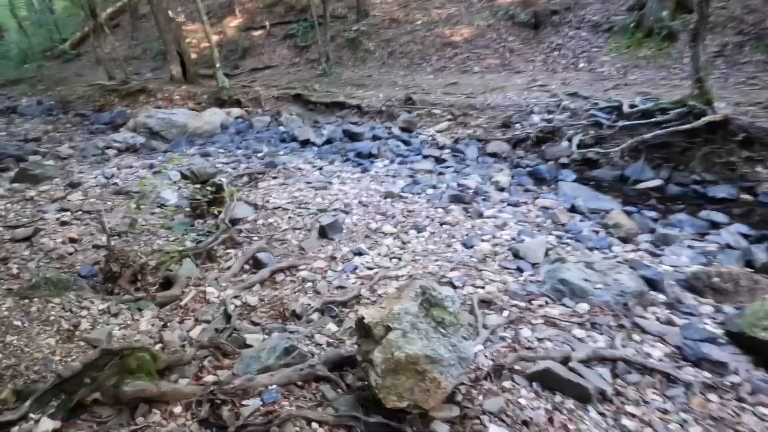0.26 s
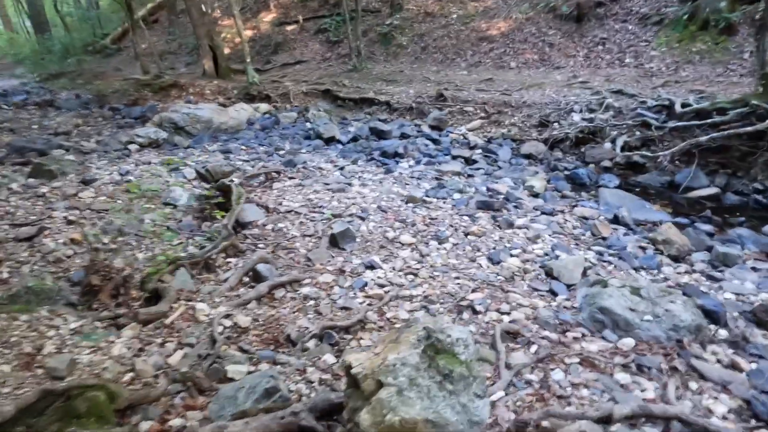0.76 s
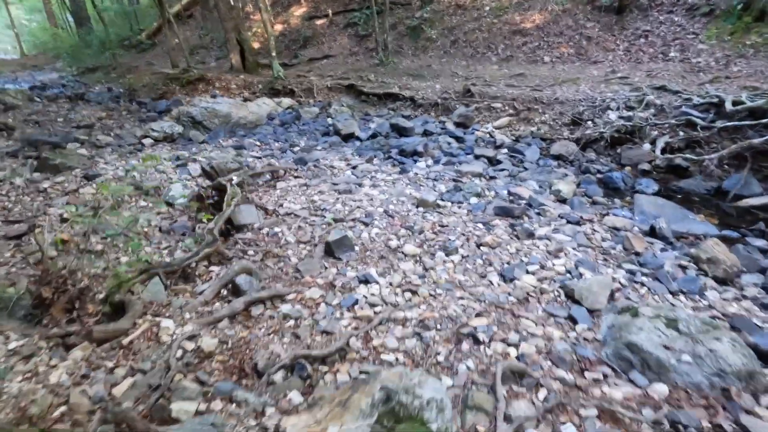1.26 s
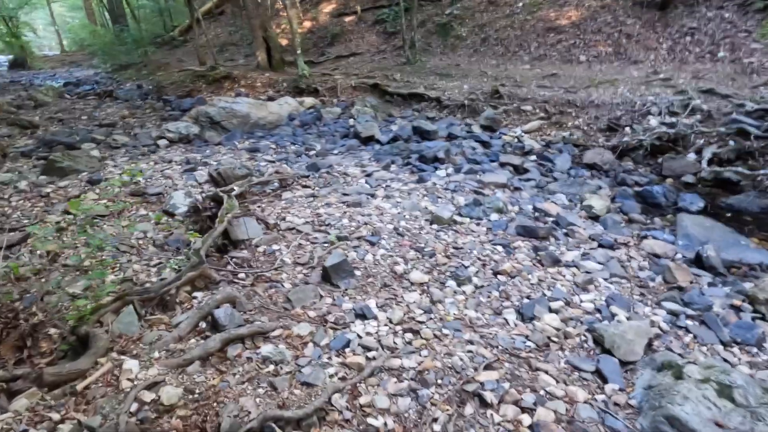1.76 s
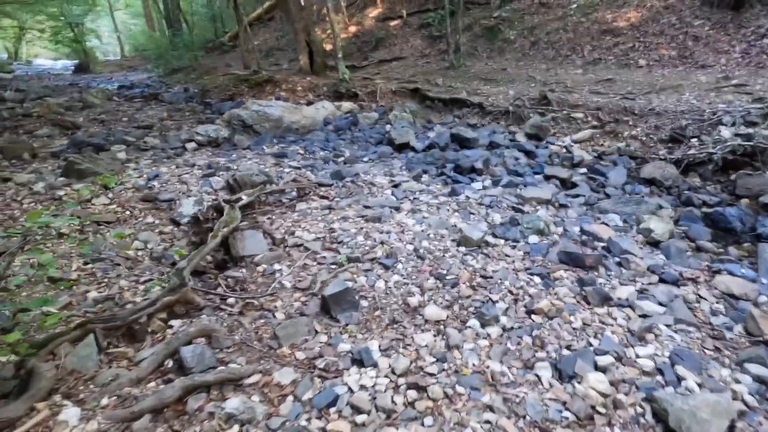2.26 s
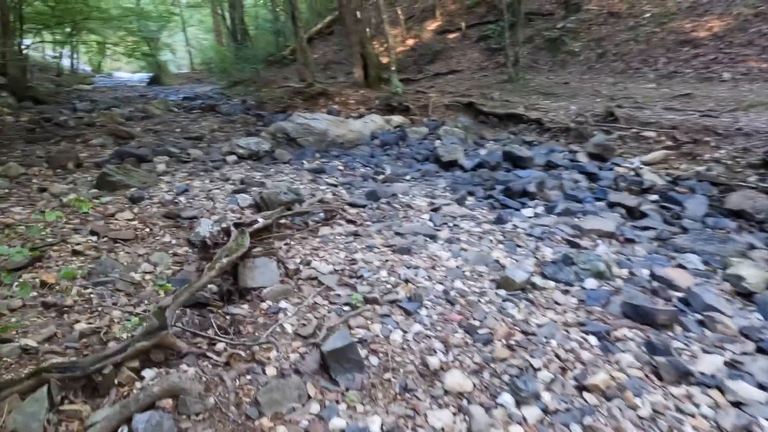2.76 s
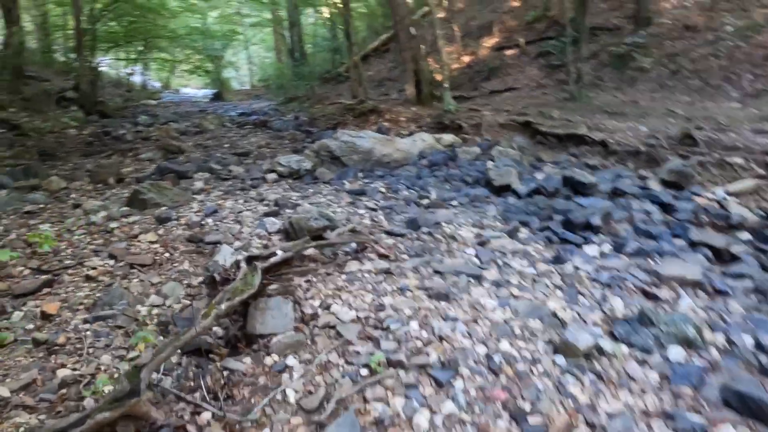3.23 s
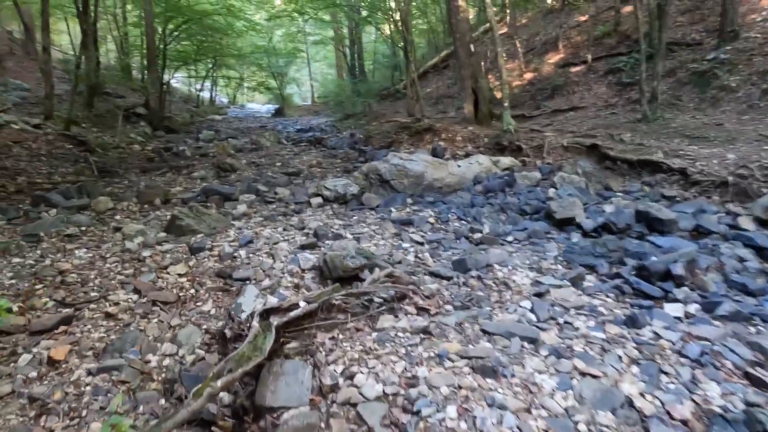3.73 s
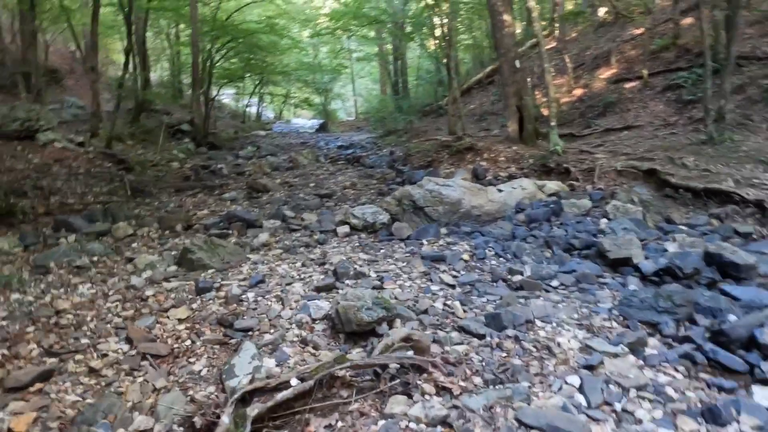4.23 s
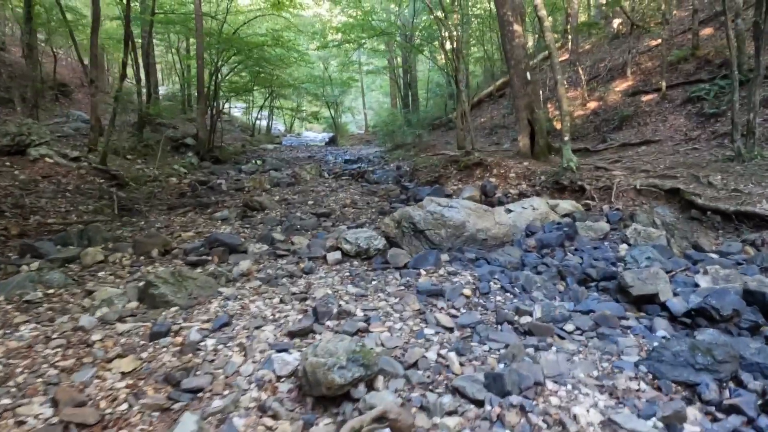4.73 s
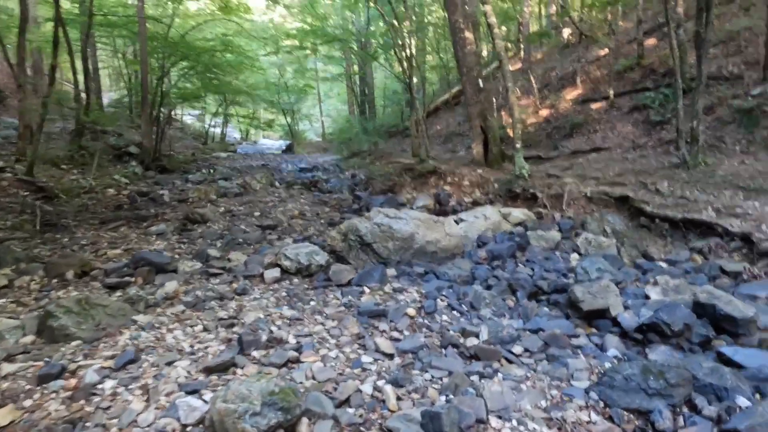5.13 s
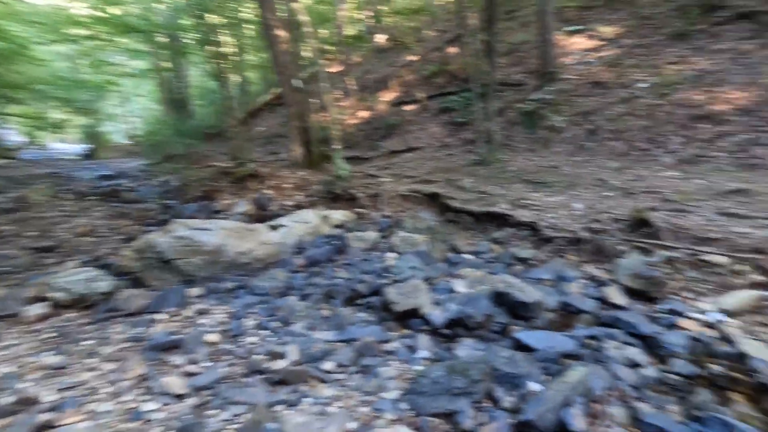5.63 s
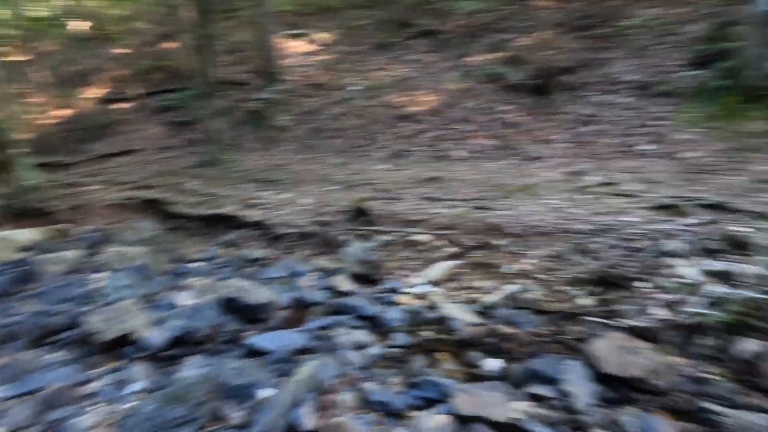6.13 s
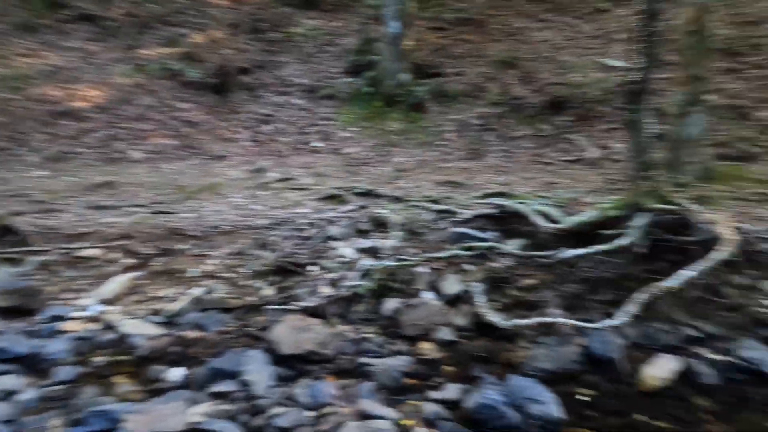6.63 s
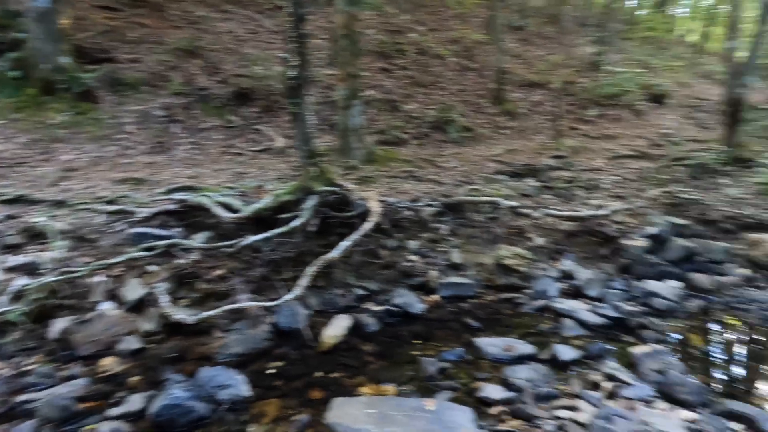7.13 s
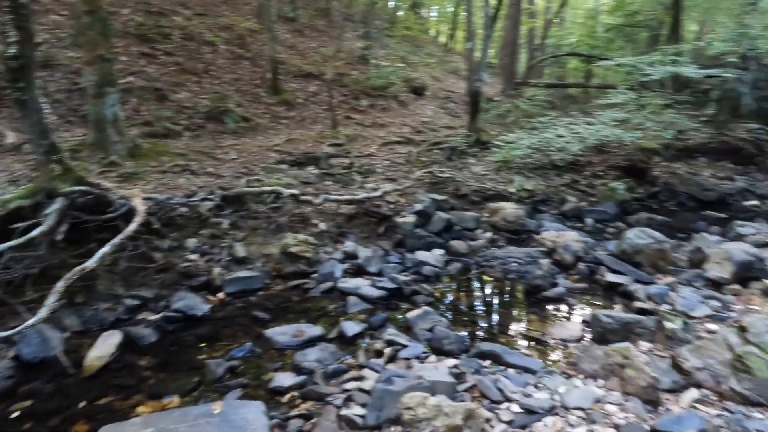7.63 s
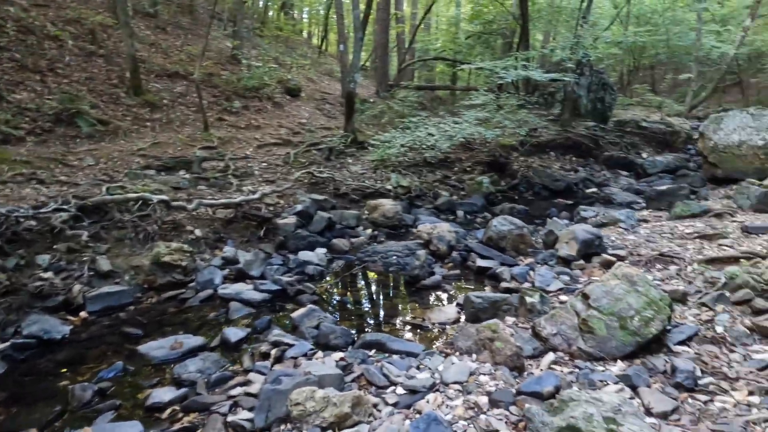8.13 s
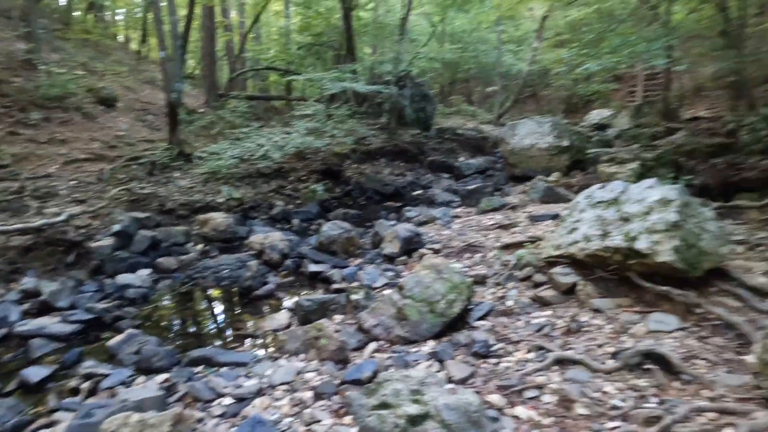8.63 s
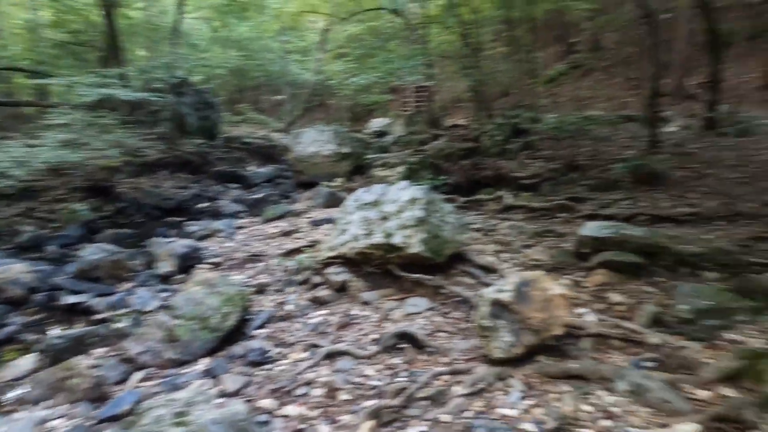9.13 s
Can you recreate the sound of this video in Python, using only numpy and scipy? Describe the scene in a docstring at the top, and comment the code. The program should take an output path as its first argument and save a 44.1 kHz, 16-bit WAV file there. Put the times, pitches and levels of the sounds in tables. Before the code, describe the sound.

Slow footsteps crunch over loose creek gravel, stones knocking and grinding, while insects whirr faintly overhead and low wind rumble thumps the microphone once.

```python
"""Slow steps on creek stones

Someone walks slowly over loose stones and gravel in a dry creek bed in a wood.
Large stones knock (short ringing tones) and grind (dense random catches that ring the stones).
Pebbles, grit and sand crunch: thousands of tiny random collisions under each press of the shoe.
Insects whirr high in the trees (wavering noise in a narrow band of treble).
Air and the jolts of walking rumble on the microphone (deep noise), and one gust thumps it."""
import sys
import numpy as np
from scipy import signal
from scipy.fft import rfft, irfft, next_fast_len
from scipy.io import wavfile
from scipy.ndimage import uniform_filter1d

SR = 44100
rng = np.random.default_rng(int(sys.argv[2]) if len(sys.argv) > 2 else 0)


def generate_wav(signal):
    """Clip the signal to [-1, 1] and save it as 16-bit WAV at the path in sys.argv[1]."""
    frames = np.transpose(np.atleast_2d(signal))
    scaled = np.clip(frames, -1, 1) * 32767
    pcm = np.round(scaled).astype(np.int16)
    wavfile.write(sys.argv[1], SR, pcm)


N = 413658  # length in samples
CURVE_STEP = 40  # samples between the points of a swell


def from_db(db):
    """Turn decibels into a gain."""
    return 10 ** (np.asarray(db) / 20)


def rms_one(x):
    """Scale a sound to an average (rms) level of 1."""
    return x / np.sqrt(np.mean(x ** 2) + 1e-20)


def gains_in_time(rows):
    """Join the rows with straight lines in dB; gives one gain curve for each dB column."""
    seconds, *columns = np.transpose(rows)
    t = np.arange(N) / SR
    return [from_db(np.interp(t, seconds, column)) for column in columns]


def colour(x, points):
    """Filter a sound through (pitch_hz, level_db) points, without any sound before its cause."""
    size = next_fast_len(N + SR // 2, real=True)
    hz, db = np.transpose(points)
    grid = np.fft.rfftfreq(8192, 1 / SR) + 1  # 1 Hz up, as zero has no logarithm
    wanted = from_db(np.interp(np.log(grid), np.log(hz), db))
    # folding the cepstrum gives the minimum-phase filter
    cepstrum = irfft(np.log(wanted))
    cepstrum[1:len(grid) - 1] *= 2
    cepstrum[len(grid):] = 0
    response = irfft(np.exp(rfft(cepstrum)))
    return irfft(rfft(x, size) * rfft(response, size), size)[..., :N]


def pan(x, db):
    """Make left louder than right by db; a negative db leans right."""
    return x * from_db(db * np.array([[1], [-1]]) / 2)


def drift(rate):
    """A random curve of rms 1 with this many turning points a second."""
    points = rng.standard_normal(int(N / SR * rate) + 2)
    return rms_one(np.interp(np.arange(N) / SR * rate, np.arange(len(points)), points))


def noise(spectrum, side_db):
    """Coloured stereo noise of rms 1, partly different in the two ears."""
    mid, side = rng.standard_normal((2, N))
    return rms_one(colour(mid + from_db(side_db) * side * [[1], [-1]], spectrum))


def ring(clicks, hz, cycles):
    """A resonance at one pitch that dies by 60 dB in so many cycles."""
    angle = 2 * np.pi * hz / SR
    radius = np.exp(-np.log(1000) * hz / (cycles * SR))
    feedback = [1, -2 * radius * np.cos(angle), radius * radius]
    return signal.lfilter([1, 0, -1], feedback, clicks + 1e-18)


def blow(x, db):
    """Give a short sound the energy of 5 ms at this level."""
    return from_db(db) * x / np.sqrt(np.sum(x ** 2) / (.005 * SR))


def add(out, s, sound):
    """Mix a sound in at time s."""
    at = round(s * SR)
    out[at:at + len(sound)] += sound[:N - at]


def swell(start, swell_s, release_s):
    """Build up to 1, then let go, falling 20 dB in the release time; both are curved."""
    t = np.arange(0, N, CURVE_STEP) / SR - start
    rise = np.clip(t / swell_s, 0, 1) ** 1.4
    return rise * from_db(-20 * (np.maximum(t - swell_s, 0) / release_s) ** 1.3)


def together(shapes, dbs):
    """One gain curve from overlapping swells, whose powers add."""
    gain = np.sqrt(from_db(dbs) ** 2 @ np.square(shapes))
    return np.interp(np.arange(N), np.arange(0, N, CURVE_STEP), gain)


# Tone of the hush of the wood and of the insects: pitch_hz, level_db
HUSH_TONE = [(400, -5), (800, -7.5), (1200, 3), (2500, -3), (3800, -7.5), (5500, -6.5), (8000, -31),
             (9300, -14.5), (13600, -21), (14600, -29)]
INSECT_TONE = [(5000, -27), (6100, -12.5), (6550, 0), (7000, 5.5), (7300, 2), (7600, -7.5), (7950, -14.5),
               (8400, -29)]


def woods(insect_db=-50.5, waver_db=-2.2, hush_db=-61):
    """Many far insects blend into one wavering high whirr over the hush of the wood."""
    whirr_gain = from_db(insect_db + waver_db * drift(rate=2.68))
    insects = whirr_gain * noise(INSECT_TONE, side_db=-6.5)
    hush = from_db(hush_db) * noise(HUSH_TONE, side_db=-6.5)
    return pan(insects, db=2.5) + pan(hush, db=9.5)


# Tone of the deep and the upper rumble: pitch_hz, level_db
DEEP_TONE = [(12, -14.5), (25, -1), (50, 2), (95, -7), (150, -20), (300, -61), (2000, -110)]
UPPER_TONE = [(60, -18.5), (115, 1.5), (180, 0.5), (265, -4), (325, -14), (500, -30), (4000, -100)]
# Breeze on the microphone, before the trims in air(): time_s, deep_level_db, upper_level_db
BREEZE_LEVELS = [(0.0, -41.5, -43.5), (2.6, -38.5, -40.5), (3.65, -42.5, -38.5), (5.4, -39, -39.5),
                 (6.3, -40, -42.5), (7.8, -45.5, -38.5), (9.38, -38.5, -39.5)]
# Gusts on the microphone, before the same trims: start_s, swell_s, release_s, deep_level_db
GUST_SWELLS = [(6.5, 0.058, 0.42, -21), (6.921, 0.077, 0.62, -16.5), (7.15, 0.26, 0.047, -24.5)]
# The thump of a gust: start_s, level_db, pitch_hz
GUST_THUMPS = [(6.995, -9.5, 128), (7.042, -13.5, 148.7)]


def air(deep_db=0.5, upper_db=1.0, gust_upper_db=-29, surge_db=2.0, thump_s=0.0041):
    """Breeze and gusts make a low, uneven rumble, its deep part stronger on the right; one gust thumps."""
    deep_gain, upper_gain = gains_in_time(BREEZE_LEVELS)
    gust = together([swell(s, up, down) for s, up, down, _ in GUST_SWELLS], [db for *_, db in GUST_SWELLS])
    deep = np.hypot(deep_gain, gust) * noise(DEEP_TONE, side_db=-17.5)
    upper = np.hypot(upper_gain, from_db(gust_upper_db) * gust) * noise(UPPER_TONE, side_db=-21.0)
    rumble = pan(from_db(deep_db) * deep, db=-3.5) + pan(from_db(upper_db) * upper, db=0.5)
    surges = rms_one(from_db(surge_db * drift(rate=12)))
    thump = np.zeros(N)
    t = np.arange(SR // 10) / SR
    for s, db, hz in GUST_THUMPS:
        push = t ** 2 * np.exp(-2 * t / thump_s)  # strongest after thump_s
        add(thump, s, blow(np.sin(2 * np.pi * hz * t) * push, db))
    return surges * rumble + pan(thump, db=-11.0)


# The shoe comes down; the level is that of the ground's thud: start_s, level_db
FOOTFALL_THUDS = [(0.106, -17), (0.598, -25.5), (1.335, -30.5), (2.058, -21.5), (2.2, -35), (2.285, -29),
                  (2.679, -22), (2.765, -25), (3.295, -29), (3.94, -27), (4.036, -25), (4.529, -18.5),
                  (5.188, -20), (5.258, -13.5), (5.306, -23.5), (5.936, -19), (7.236, -24.5)]


def jolts(jolt_db=-33, swell_s=0.036, release_s=0.29):
    """Each footfall shakes the hand-held microphone into a short, deep rumble, always equally strong."""
    shapes = [swell(s, swell_s, release_s) for s, _ in FOOTFALL_THUDS]
    shake = together(shapes, [jolt_db] * len(FOOTFALL_THUDS))
    return pan(shake * noise(DEEP_TONE, side_db=-22), db=-2.5)


# The shoe loads the gravel, before a small lift in footsteps():
# start_s, swell_s, release_s, pebble_level_db, grit_level_db, sand_level_db
SHOE_PRESSES = [(0.02, 0.089, 0.043, -30, -37, -45.5), (.11, 0.022, 0.47, -50, -53, -69),
                (.6, 0.037, 0.3, -50, -55, -72.5), (1.2, 0.45, 0.38, -51, -56, -73.5),
                (1.968, 0.094, 0.31, -42, -49, -61.5), (2.148, 0.038, 0.073, -35.5, -43, -60),
                (2.26, 0.028, 0.034, -41.5, -52, -68.5), (2.555, .014, 0.19, -33, -32, -39.5),
                (2.6, 0.45, 0.45, -46, -49, -63), (3.059, 0.046, .15, -35.5, -46.5, -69),
                (3.19, 0.14, 0.035, -33.5, -38, -48), (3.301, .13, 0.42, -52, -45, -45.5),
                (3.91, 0.026, 0.21, -33, -37.5, -61), (4.101, 0.19, 0.29, -52, -57, -70.5),
                (4.493, 0.03, 0.24, -35, -35, -43.5), (4.965, 0.011, 0.028, -31, -35, -46),
                (5.1, 0.08, 0.24, -37, -41.5, -55.5), (5.349, 0.02, 0.22, -40, -43.5, -61.5),
                (5.922, 0.011, 0.036, -35, -36.5, -40), (5.9, 0.38, 0.16, -35, -38.5, -51.5),
                (6.31, 0.055, 0.08, -37, -37, -50), (6.66, 0.036, 0.071, -31.5, -33, -47.5),
                (6.74, 0.022, 0.06, -26, -26.5, -33), (7.14, 0.17, 0.26, -33, -30, -49),
                (7.42, 0.092, 0.26, -30.5, -33.5, -46), (7.699, 0.037, 0.1, -34, -38, -49),
                (8.385, 0.023, 0.16, -37.5, -43.5, -54.5), (8.569, 0.017, 0.12, -35, -41.5, -64.5),
                (8.811, 0.094, 0.14, -38, -38, -62.5), (9.04, 0.053, 0.091, -23, -29, -40.5),
                (9.155, 0.029, 0.17, -28.5, -25, -37)]
# A stone knocks on another, before the edge clicks are coloured:
# start_s, knock_level_db, knock_pitch_hz, click_level_db, click_pitch_hz
STONE_KNOCKS = [(0.077, -33, 600, -42, 4500), (0.105, -24, 433, -32, 5450), (0.273, -62, 1220, -44, 5250),
                (0.6, -31.5, 698, -40.5, 2920), (2.057, -27, 791.6, -33, 4800),
                (2.2, -33.5, 1039, -36.5, 3840), (2.601, -21, 951, -40, 3502), (2.61, -22, 1080, -40, 3040),
                (2.619, -20, 1040, -36, 3030), (2.628, -19, 892, -37.5, 3910),
                (2.664, -19, 1030, -38, 3190), (2.681, -25.5, 1050, -27.5, 3150),
                (2.69, -24.5, 1010, -42, 2410), (2.712, -27, 1310, -42, 2410),
                (2.724, -29, 1160, -45, 2270), (2.751, -32.5, 816, -44, 5770), (2.764, -31, 506, -30, 3300),
                (2.911, -33, 1150, -52, 5610), (2.948, -34, 1150, -55, 6820),
                (3.08, -31, 1063, -49.5, 3350), (3.111, -32.5, 1150, -42.5, 2290),
                (3.138, -29, 905, -39, 2930), (3.33, -48, 1099, -30.5, 4400),
                (3.931, -23.5, 517.3, -50, 3790), (3.94, -35, 2100, -18, 4480),
                (4.036, -33, 1422, -29.5, 2575), (4.155, -29, 1008, -38.5, 3780),
                (4.349, -30.5, 1652, -31, 2600), (4.397, -24.5, 1353, -31.5, 2875),
                (4.529, -18.5, 1079, -26.5, 3565), (4.545, -27, 896, -29.5, 5180),
                (4.557, -32.5, 1001, -30, 4290), (5.016, -28.5, 1120, -39.5, 5680),
                (5.104, -21.5, 1120, -37.5, 4664), (5.144, -15, 1094, -33.5, 4240),
                (5.188, -24.5, 438.3, -36.5, 3760), (5.256, -15.5, 1070, -27.5, 3554),
                (5.305, -27, 948, -41.5, 4310), (5.373, -33, 1378, -40, 3683),
                (5.931, -20, 441, -27.5, 4560), (5.972, -31, 876, -27.5, 5104),
                (6.068, -35.5, 1364, -40.5, 6050), (6.23, -28.5, 1405, -33, 3180),
                (6.246, -31.5, 1476, -31, 4300), (6.274, -26, 546, -24.5, 4900),
                (6.331, -23.5, 850, -20.5, 4000), (6.364, -28, 680, -30.5, 3112),
                (6.436, -47, 891.5, -34.5, 5555), (6.673, -28, 1584, -37, 2493),
                (6.695, -28.5, 1389, -38, 6494), (6.707, -22, 1246, -39, 2972),
                (6.766, -23.5, 1208, -19, 4960), (6.776, -30, 1117, -24.5, 2590),
                (6.794, -36.5, 1270, -32, 3010), (7.069, -52, 1514, -37.5, 4930),
                (7.179, -36, 1912, -35, 2230), (7.234, -17, 494.5, -22.5, 3844),
                (7.271, -31.5, 919.5, -26.5, 5220), (7.296, -26, 450, -34.5, 3000),
                (7.313, -21, 520, -36, 4725), (7.354, -28, 417.6, -27, 4610), (7.391, -30, 2106, -24, 3640),
                (7.421, -34.5, 1207, -15, 4180), (7.451, -17, 1957, -10, 5110),
                (7.464, -19, 626, -29.5, 4930), (7.481, -22.5, 550, -16.5, 5000),
                (7.489, -20, 749.6, -17, 5165), (7.526, -19.5, 1008, -21.5, 3203),
                (7.574, -18.5, 515.5, -27.5, 4173), (7.621, -27, 1096, -37, 3067),
                (7.657, -26.5, 452, -36.5, 2744), (7.777, -30, 1234, -26, 5175),
                (7.873, -27, 1505, -30, 2600), (8.141, -22.5, 1150, -21.5, 2980),
                (8.15, -28.5, 1400, -22.5, 4160), (8.236, -14, 524, -18.5, 2560),
                (8.237, -17, 1394, -22, 6240), (8.304, -21, 807, -24, 2885), (8.31, -21, 997, -27, 2835),
                (8.315, -23, 766, -36.5, 2900), (8.386, -29, 911, -27.5, 6890),
                (8.393, -15, 714, -27, 6700), (8.484, -32.5, 1480, -48.5, 3525),
                (8.578, -25, 655.5, -33.5, 2810), (8.64, -30, 716, -52, 3727),
                (8.67, -27.5, 567, -43.5, 4764), (8.79, -35, 716, -33, 2600),
                (8.984, -27, 794.5, -36, 2500), (9.044, -13, 798, -23.5, 4253),
                (9.073, -15.5, 889, -25, 2893), (9.087, -8, 401.5, -19, 2835), (9.094, -11, 846, -21, 6270),
                (9.115, -14, 950, -25, 3000), (9.123, -17, 947, -22.5, 3650),
                (9.165, -28, 880, -20.5, 3150), (9.175, -22, 960, -14.5, 2730),
                (9.18, -17, 696, -15.5, 2918), (9.195, -12, 655, -16, 3034),
                (9.244, -41, 1400, -27.5, 4000)]


def shifting(settle_db=-20.5, settle_s=.45, stir_swell_s=.008, stir_s=.07):
    """How strongly pebbles, grit and sand move: presses, their settling, and the stir after each knock."""
    presses = [np.maximum(swell(s, up, down), from_db(settle_db) * swell(s, up, settle_s))
               for s, up, down, *_ in SHOE_PRESSES]
    stirs = [swell(s, stir_swell_s, stir_s) for s, *_ in STONE_KNOCKS]
    _, knock_db, _, click_db, _ = np.transpose(STONE_KNOCKS)
    # a knock stirs the pebbles, its edge click the grit and the sand
    stirred = knock_db - 23, click_db - 23, click_db - 37
    rests_db = -67, -73, -87.5  # the bed is never quite still under the walker
    press_levels = np.transpose(SHOE_PRESSES)[3:]
    return [np.hypot(together(presses + stirs, np.r_[press, stir]), from_db(rest))
            for press, stir, rest in zip(press_levels, stirred, rests_db)]


# Tone of each size of grain: pitch_hz, level_db
PEBBLE_TONE = [(120, -33.5), (260, 6.5), (450, 2.5), (750, -8), (1100, -2), (1700, -8), (2500, -10),
               (5000, -40)]
GRIT_TONE = [(900, -12.5), (1600, 4.5), (2300, 1.5), (3700, 4), (5200, 3), (7200, -4.5), (8400, -9.5),
             (14000, -27.5)]
SAND_TONE = [(3000, 0), (6000, 6), (7600, 8), (8700, -0.5), (10600, 0.5), (13500, -12), (15000, -21)]


def grains(level, spectrum, per_s, spread_db, cycles, low_hz, high_hz, even_s=0.0435, own_octaves=0.52, count=14):
    """Random collisions, more when the shoe presses harder; each rings short modes around its own pitch."""
    chance = per_s * (.5 + np.sqrt(level / level.max())) / SR
    hits = np.flatnonzero(rng.random(N) < chance)
    sizes = from_db(spread_db * np.minimum(rng.exponential(1, len(hits)), 4))
    own_hz = low_hz * (high_hz / low_hz) ** rng.random(len(hits))
    x = 0
    for hz in np.geomspace(low_hz, high_hz, count):
        clicks = np.zeros(N)
        near = np.exp(-(np.log2(hz / own_hz) / own_octaves) ** 2)
        strength = rng.standard_normal(len(hits)) * rng.exponential(1, len(hits))
        clicks[hits] = sizes * near * strength
        x = x + hz * ring(clicks, hz, cycles)
    x = rms_one(colour(x, spectrum))
    # the work of the shoe is shared among the grains that move at that moment
    power = np.abs(uniform_filter1d(x ** 2, int(even_s * SR)))
    return level * x / np.sqrt(power + 0.1)


def gravel(pebble, grit, sand, rustle_db=-48, sand_rustle_db=-66, slip_db=4.5):
    """Pebbles clack, grit crackles and sand hisses; faint shifting blurs to a rustle of plain noise."""
    pebbles = grains(pebble, PEBBLE_TONE, per_s=1500, spread_db=2.2, cycles=9.9, low_hz=356.0, high_hz=2226)
    grits = grains(grit, GRIT_TONE, per_s=2400, spread_db=4.5, cycles=17.0, low_hz=1590, high_hz=6940)
    sands = grains(sand, SAND_TONE, per_s=1200, spread_db=0.5, cycles=5.7, low_hz=5640, high_hz=15400)
    # the bed sticks and gives way, moving all sizes at once
    slips = rms_one(from_db(slip_db * drift(rate=170)))
    layers = [(pebbles, pebble, PEBBLE_TONE, rustle_db),
              (grits, grit, GRIT_TONE, rustle_db),
              (sands, sand, SAND_TONE, sand_rustle_db)]
    out = 0
    for grain, level, spectrum, blur_db in layers:
        blurred = 1 / (1 + level / from_db(blur_db))  # share of rustle, near 1 when faint
        crunch = np.sqrt(1 - blurred) * slips * grain
        rustle = np.sqrt(blurred) * level * noise(spectrum, side_db=-9.0)
        out = out + crunch + rustle
    return out


def contact(slip_s=0.0022, slip_db=-20, settle_s=0.016, settle_db=-39):
    """The force of one touch: an impulse, a rough slip and a little settling."""
    t = np.arange(SR // 16) / SR
    slip = from_db(slip_db) * np.exp(-(t / slip_s) ** 2)
    settling = from_db(settle_db) * np.exp(-t / settle_s)
    return (t == 0) + (slip + settling) * rng.laplace(0, np.sqrt(.5), len(t))


def struck(force, hz, modes, unlike=0.012, top=1.82):
    """A stone's modes, each slightly off at random in pitch; the contact time limits the top."""
    x = 0
    for multiple, db, cycles in modes:
        mode_hz = hz * multiple * np.exp(unlike * rng.standard_normal())
        x = x + blow(ring(force, mode_hz, cycles), db)
    return signal.sosfilt(signal.butter(3, top * hz, fs=SR, output="sos"), x)


# What the body of a knocked stone rings with: pitch_multiple, level_db, cycles to die away
BODY_MODES = [(.58, -5, 33), (1, 18, 7.4), (1.38, -15.5, 14)]


def clack(force, hz, bottom=0.27):
    """The body of a stone: too small to radiate much below its lowest mode."""
    low_cut = signal.butter(2, bottom * hz, "high", fs=SR, output="sos")
    return signal.sosfilt(low_cut, struck(force, hz, BODY_MODES))


def thud(force, db, thud_hz=243, thud_cycles=3.6):
    """The ground answers a blow with one low, dead mode, at 0.91 of thud_hz."""
    return blow(struck(force, thud_hz, [(0.91, 0, thud_cycles)]), db)


def loose_stones(pebble, per_s=29, typical_db=-51, spread_db=2, follows=0.49, middle_hz=1150, spread_octaves=0.69):
    """Small stones roll loose and tick at random, each with a random size, louder while the bed moves."""
    out = np.zeros(N)
    moving_db = 20 * np.log10(pebble)
    moving_db = moving_db - moving_db.mean()
    chance, sizes = rng.random(N), rng.standard_normal((N // 64 + 1, 2))
    force = contact()
    for i in np.flatnonzero(chance < per_s / SR):
        strength, size = np.clip(sizes[i // 64], -2, 2)
        knock = clack(force, middle_hz * 2 ** (spread_octaves * size))
        # follows: share of the pebbles' swing in dB
        add(out, i / SR, blow(knock, typical_db + follows * moving_db[i] + spread_db * strength))
    return out


# The sole drags stones over each other; the level is that of the body, the rasp comes on top:
# start_s, swell_s, release_s, level_db, pitch_hz
STONE_GRINDS = [(2.558, .022, 0.22, -26.5, 879), (4.595, 0.024, 0.15, -31, 750),
                (6.03, 0.26, 0.13, -33.5, 1119), (6.68, 0.087, .09, -29, 1250),
                (7.18, .14, 0.16, -27.5, 490.5), (7.44, 0.081, 0.17, -27.5, 559.7),
                (9.046, 0.061, 0.059, -14, 420), (9.166, 0.017, 0.12, -22, 770)]


def grinding(per_s=2000, cycles=2.8, burst_db=5.5, bursts_per_s=150, rasp_db=-8):
    """Dense catches and slips in uneven bursts ring the dragged stones and rasp on their edges."""
    bursts = from_db(burst_db * drift(rate=bursts_per_s))
    catches = (rng.random(N) < per_s / SR) * rng.standard_normal(N) * bursts
    rasp = from_db(rasp_db) * rms_one(colour(catches, GRIT_TONE))
    out = 0
    for s, up, down, db, hz in STONE_GRINDS:
        # stones of like size merge into one broad resonance
        band = signal.butter(2, [hz / 2, hz * 2], "band", fs=SR, output="sos")
        body = signal.sosfilt(band, ring(catches, hz, cycles))
        out = out + together([swell(s, up, down)], [db]) * (rms_one(body) + rasp)
    return out


# A thin chip of slate pings: start_s, level_db, pitch_hz
SLATE_PINGS = [(7.419, -23.5, 3300), (8.304, -20.5, 7440), (8.316, -28, 7300), (8.391, -28.5, 7070)]


def pings(cycles=85):
    """Slate chips ring for more cycles than the round stones."""
    out = np.zeros(N)
    for s, db, hz in SLATE_PINGS:
        add(out, s, blow(struck(contact(), hz, [(1, 0, cycles)], top=1), db))
    return out


# What the edge of a knocked stone rings with: pitch_multiple, level_db, cycles to die away
EDGE_MODES = [(.7, 11, 3.1), (1, 10.5, 9.1), (1.26, -28, 37), (1.56, -11, 3)]
# Tone shared by all edge clicks: pitch_hz, level_db
EDGE_TONE = [(3000, 2), (3700, -7), (4600, 0), (7600, 1), (8500, -12.5), (14000, -4)]


def stones(rebound_db=-3, ground_db=-16):
    """Each touch excites the stone and the ground, and with a quick rebound its edge; footfalls thud."""
    knocks, clicks = np.zeros(N), np.zeros(N)
    for s, knock_db, knock_hz, click_db, click_hz in STONE_KNOCKS:
        force = contact()
        delay_s = rng.uniform(.0007, 0.002)
        rebound = np.roll(force, int(delay_s * SR)) * from_db(rebound_db)
        knock = clack(force, knock_hz)
        click = struck(force + rebound, click_hz, EDGE_MODES)
        add(knocks, s, blow(knock, knock_db) + thud(force, knock_db + ground_db))
        add(clicks, s, blow(click, click_db))
    for s, db in FOOTFALL_THUDS:
        add(knocks, s, thud(contact(), db))
    return knocks + colour(clicks, EDGE_TONE)


# Sound scattered by the stones nearby: pitch_hz, level_db
SCATTER_TONE = [(300, -36), (1000, -20), (5000, -18), (8000, -6), (13000, 0.5)]
# The tail among the trees, before wet_db: pitch_hz, level_db
TAIL_TONE = [(100, -42), (500, -8), (1300, 2.5), (5000, -9), (14000, -4)]


def among_trees(x, t60=0.64, wet_db=-20, scatter_s=0.0049):
    """Near stones scatter the treble at once; trunks and banks return a faint tail, different in each ear."""
    t = np.arange(SR) / SR
    near = rms_one(rng.standard_normal((2, SR)) * np.exp(-t / scatter_s))
    fade = from_db(-60 * t / t60) * np.minimum(t / 0.0035, 1)
    far = rms_one(rng.standard_normal((2, SR)) * fade)
    scatter = signal.fftconvolve(x, near / np.sqrt(SR), axes=1)[:, :N]
    tail = signal.fftconvolve(x, far / np.sqrt(SR), axes=1)[:, :N]
    return x + colour(scatter, SCATTER_TONE) + from_db(wet_db) * colour(tail, TAIL_TONE)


# The steps lean to the left: pitch_hz, left_over_right_db
STEP_LEAN = [(100, 0.5), (400, 0.5), (1200, 5), (4400, 1.2), (8000, 0.5), (12000, 2.5)]


def footsteps(pebble, grit, sand, gravel_db=0.5):
    """Stones and gravel, a little to the left, with their echo among the trees."""
    ground = stones() + pings() + grinding() + loose_stones(pebble)
    left, right = ground + from_db(gravel_db) * gravel(pebble, grit, sand)
    left = colour(left, [(hz, db / 2) for hz, db in STEP_LEAN])
    right = colour(right, [(hz, -db / 2) for hz, db in STEP_LEAN])
    return among_trees(np.array([left, right]))


def scene():
    """Wood, air, jolts and steps together."""
    return woods() + air() + jolts() + footsteps(*shifting())


def record(dry, cutoff_hz=16600):
    """Peaks are clipped at full scale, then the top is cut steeply."""
    top_cut = signal.cheby2(12, 70, cutoff_hz, fs=SR, output="sos")
    return signal.sosfilt(top_cut, np.clip(dry, -1, 1))


dry = scene()
out = record(dry)
generate_wav(out)
```